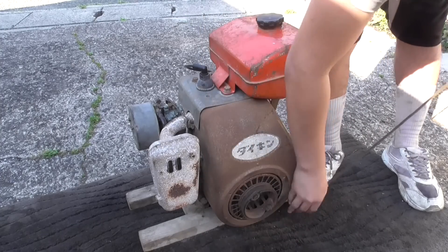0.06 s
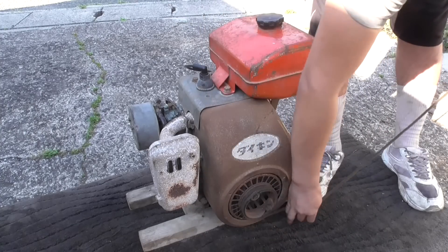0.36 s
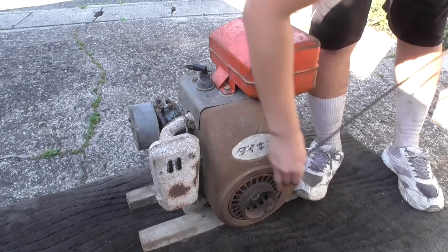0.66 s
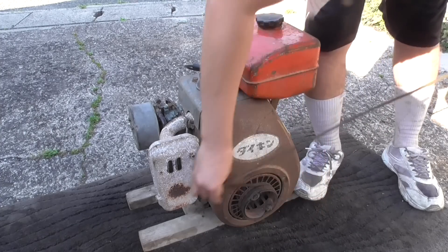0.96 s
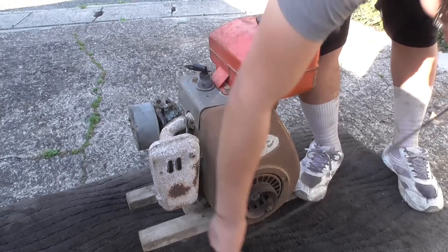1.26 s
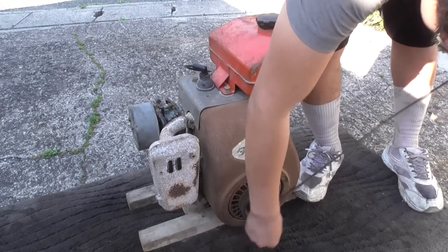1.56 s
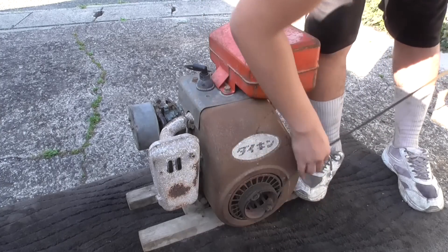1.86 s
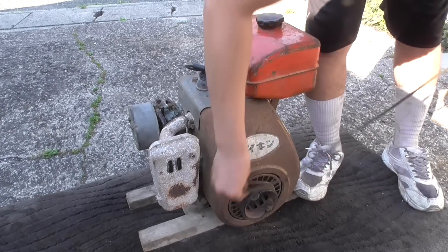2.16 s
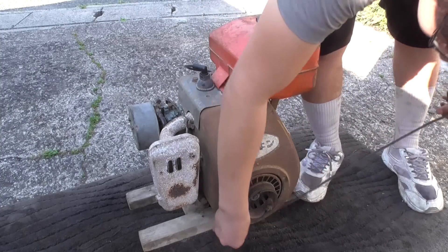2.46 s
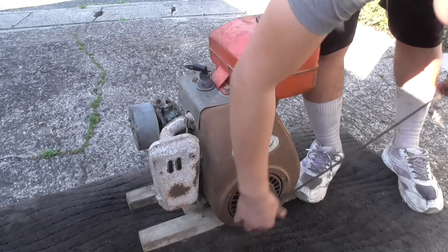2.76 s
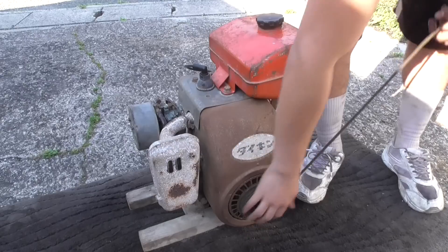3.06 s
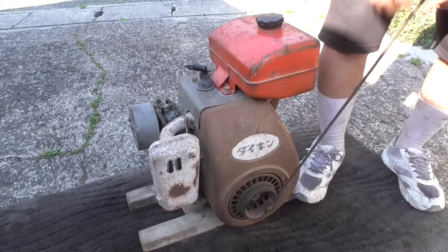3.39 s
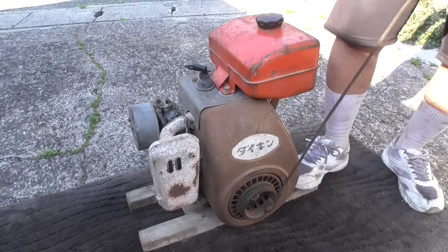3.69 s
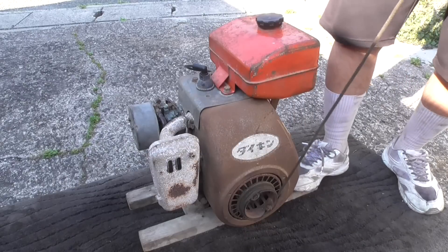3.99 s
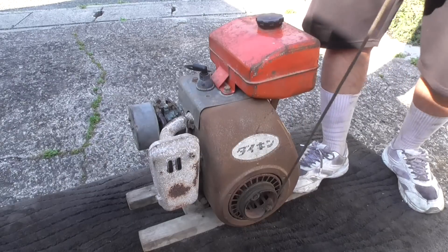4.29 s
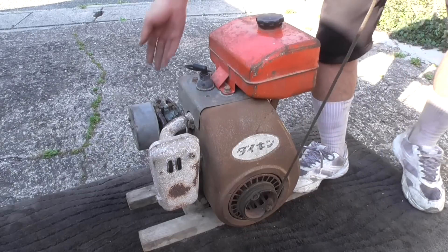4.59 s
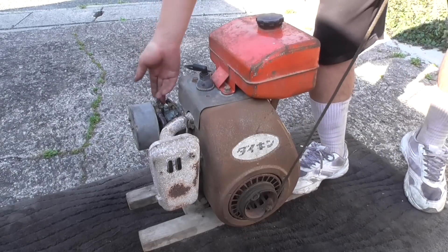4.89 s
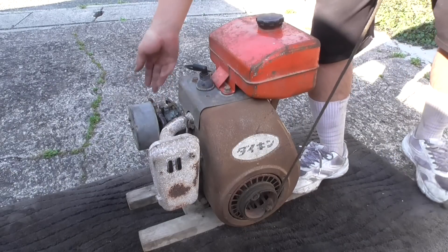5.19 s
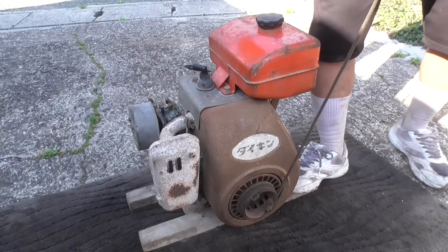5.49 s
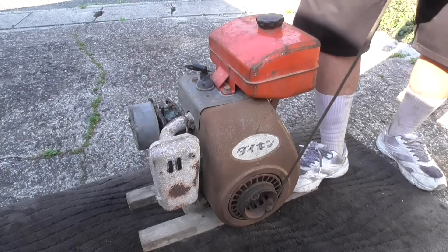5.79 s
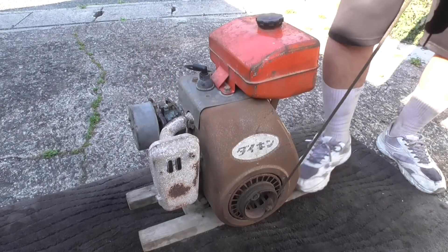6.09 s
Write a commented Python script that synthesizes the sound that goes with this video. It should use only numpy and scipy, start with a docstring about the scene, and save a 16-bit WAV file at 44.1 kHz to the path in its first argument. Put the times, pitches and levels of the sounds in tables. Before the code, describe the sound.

A rope rasps faintly round a small engine's pulley with light metal knocks and clinks, then one sharp ringing click, over distant traffic.

```python
"""A rope rasps in short pulls over a murmur of distant traffic: a starter cord is being wound by hand
round the pulley of a small, cold engine outdoors. Its fibres catch and slip, it zips into the groove and
clinks on the rim, the pulley knocks in its play, and an arm brushes the muffler's tin cover.
A breeze rumbles on the microphone, and the sound drops out for an instant.
Near the end a small lever snaps over and the engine's metal rings on."""
import sys
import numpy as np
from scipy import signal
from scipy.fft import rfft, irfft, next_fast_len
from scipy.io import wavfile

SR = 44100
rng = np.random.default_rng(int(sys.argv[2]) if len(sys.argv) > 2 else 0)


def generate_wav(signal):
    """Clip the signal to [-1, 1] and save it as 16-bit WAV at the path in sys.argv[1]."""
    frames = np.transpose(np.atleast_2d(signal))
    scaled = np.clip(frames, -1, 1) * 32767
    pcm = np.round(scaled).astype(np.int16)
    wavfile.write(sys.argv[1], SR, pcm)


N = 275625
TIME = np.arange(N) / SR

# All table levels are relative: the functions set the final balance.
# swell of the distant traffic: t/s, rumble level/dB, tyre wash level/dB
TRAFFIC = [(0, -53.5, -56), (2.2, -53, -56.5), (3.25, -47, -54.5), (4.445, -46.5, -53.5),
           (4.465, -42.5, -47.5), (4.9, -40.5, -49.5), (5.1, -47.5, -50), (6.25, -47.5, -53)]
# noise spectra of the background: f/Hz, level/dB
RUMBLE_COLOUR = [(25, -31), (45, -20.5), (75, -5), (98, -8), (125, -2), (148, -1), (200, -4), (270, 0),
                 (320, -2.5), (365, -12.5), (500, -19), (900, -41)]
WASH_COLOUR = [(200, -26), (420, -1.5), (700, -3.5), (1000, -5.5), (1350, -12), (1750, -21.5), (2500, -28),
               (4500, -32.5), (7000, -35.5)]
DRONE_COLOUR = [(70, -14), (110, -16), (149, 0), (168, -7.5), (200, -12)]
HISS_COLOUR = [(1000, 13), (3000, -14.5), (4400, -4.5), (6000, -14.5), (8000, -1.5), (11500, -3.5),
               (13500, -5.5), (16000, -13)]
WIND_COLOUR = [(22, -22.5), (40, -7), (65, -7), (100, 0.5), (140, 2.5), (200, -13), (300, -16.5),
               (600, -30.5)]
# path of the thin chirp: t/s, f/Hz, level/dB
CHIRP = [(4.652, 11950, -85), (4.660, 11900, -59), (4.668, 11500, -67), (4.674, 11300, -60),
         (4.684, 11200, -85)]
# gusts on the microphone: t/s, level/dB
GUSTS = [(0, -84), (2.15, -72), (2.27, -50), (2.52, -41), (2.8, -57.5), (3.15, -46), (3.3, -59),
         (3.88, -62), (4.02, -45), (4.2, -65), (5.2, -81)]
# small dry scuffs and taps: t/s, rise/s, fall/s, level/dB, f/Hz
TAPS = [(0.643, 0.0055, 0.016, -50, 1420), (1.224, 0.0013, 0.017, -48.5, 980),
        (4.196, .001, 0.0026, -57, 1170), (6.055, .001, 0.0017, -44.5, 1200)]

# arm bumping along the muffler cover, pulley rocking in its play: t/s, level/dB, hardness/Hz
ARM_BRUSHES = [(1.123, -57, 2460), (1.140, -52, 2250), (1.167, -53.5, 9000)]
PULLEY_KNOCKS = [(1.562, -51.5, 1380), (1.6845, -39.5, 2100), (1.6975, -39, 2050), (1.7735, -35.5, 1390),
                 (1.857, -40.5, 1110), (1.913, -39, 1090), (1.985, -47, 1070), (2.742, -36, 840),
                 (2.999, -38.5, 1540)]
# modes of the tin cover, pulley with fan housing, steel rim, lever and engine: f/Hz, level/dB, t60/s
COVER_MODES = [(1000, 6, .15), (1540, 1, .35), (1985, 1, .35), (2080, 3, .12), (2552, -8, .27),
               (2638, 1, .3), (3300, 2, .23), (5990, -3, .27), (7800, -13, .2)]
PULLEY_MODES = [(624, -42, 0.027), (719, -1.5, 0.31), (845, -9, 0.04), (1048, 7.5, 0.028), (1092, 2, 0.09),
                (1190, -7.5, 0.12), (1540, -9.5, 0.063), (1730, -10, 0.027), (2110, -9, 0.051),
                (2420, -9, 0.083)]
RIM_MODES = [(1980, 0, 0.11), (2350, 0.5, 0.095), (2610, -10, 0.12), (2800, -8, 0.3), (3370, -5.5, 0.19),
             (4520, -7, 0.17), (5560, -2, 0.074), (6270, 2, 0.036), (6650, -3, 0.092), (7840, -9, 0.26),
             (8600, 2, .04), (11700, 6, 0.049)]
LEVER_MODES = [(350, -47, 0.045), (535, -24, 0.011), (672, -16, 0.031), (827, -17, 0.025),
               (1050, -33, 0.019), (1948, -26, 0.02), (3195, -18, 0.028), (3860, -29, .03),
               (5060, -23.5, .022), (5700, -24, 0.018), (6920, -32, 0.034), (7110, -16, 0.029),
               (7600, -27, .035), (8150, -17, .035), (8700, -28, 0.037), (9260, -14, 0.024),
               (10700, -34.5, .04), (11180, -26, 0.035), (11820, -24, .04), (12480, -28, .03)]
ENGINE_MODES = [(338, -41, .3), (700, -40.5, .3), (1075, -47.5, .5), (1300, -52, .5), (1556, -54, .56),
                (1985, -56, .65), (3230, -52, .4), (3266, -56, .4), (3850, -58, .37), (5006, -60, .5),
                (5658, -47, .23), (5683, -54, .23), (6400, -60.5, .35), (6828, -56, .5), (7160, -53, .45),
                (7330, -52, .55), (8371, -49, .75), (9453, -42.5, .23), (10070, -54, .3),
                (10850, -48.5, .28), (11880, -52, .24)]
# lever hitting its stop and bouncing: t/s, level/dB
LEVER_HITS = [(5.1948, -4.5), (5.1936, -3), (5.196, -10.5)]
# spectra of the snap's crack and of the shimmer of many faint modes: f/Hz, level/dB
CRACK_COLOUR = [(200, -14), (400, -4), (580, 2), (850, 1), (1500, -5), (2500, -13), (4300, -10), (5300, -7),
                (6300, -6), (9000, 0), (11500, -1), (13500, -9), (16000, -10)]
SHIMMER_COLOUR = [(400, 4.5), (1500, -3), (2600, -11), (3250, -4.5), (4200, -5.5), (6200, -13), (7200, 3),
                  (8500, 0), (9800, -22), (12000, -16), (14000, -29.5)]

# spectra of the rasping fibres and of the metal's answer to their pressure: f/Hz, level/dB
FIBRE_COLOUR = [(600, -14), (2400, -7), (4400, -7), (6200, -3.5), (8200, 0), (9700, -3), (12000, -1.5),
                (13200, -3.5), (14500, -10.5), (16000, -16)]
PRESSURE_COLOUR = [(300, 4), (700, 17.5), (1200, 12), (1900, 3.5), (2350, 6.5), (2800, -12), (3500, 0.5),
                   (4500, -34), (5800, -10), (9000, -25)]
# pulls of the rope over the pulley: t/s, length/s, level/dB, pressure on the metal/dB
PULLS = [(0.163, 0.029, -58.5, 4), (0.231, 0.031, -59, 5), (0.368, 0.056, -55, -1.5),
         (0.506, 0.14, -53.5, 3), (0.779, 0.058, -55.5, 4), (1.040, 0.039, -55, 5),
         (1.116, 0.061, -54.5, 4.5), (1.204, 0.05, -64, 2), (1.551, 0.029, -57.5, 7.5),
         (1.599, 0.097, -57, 4.5), (1.938, 0.059, -60.5, 5.5), (2.276, 0.068, -57, 5),
         (2.439, .052, -56.5, 8), (2.582, 0.043, -59.5, 5.5), (2.704, 0.041, -53, 8.5),
         (3.004, 0.032, -57, 10)]
# rope gliding lightly between pulls: t/s, level/dB
GLIDE = [(0, -70), (.12, -92), (.66, -78), (.87, -69.5), (1.04, -65.5), (1.3, -84), (2.1, -81),
         (2.4, -71.5), (2.83, -76), (3.17, -70), (3.35, -86)]
# rope snapping home against the rim: t/s, zip level/dB, clink level/dB, favoured f/Hz
SEATINGS = [(1.678, -55.5, -65, 2350), (2.3018, -40.5, -55.5, 2400), (2.724, -50, -55, 5620),
            (3.000, -70, -61.5, 3370)]


def from_db(db):
    """Decibels to gain."""
    return 10 ** (np.asarray(db) / 20)


def rms_one(x):
    """Scale to unit rms."""
    return x / np.sqrt(np.mean(x ** 2) + 1e-20)


def colour(x, spectrum):
    """EQ a steady signal with a curve that rolls off beyond its ends; rms 1."""
    hz, db = np.transpose(spectrum)
    size = next_fast_len(N)
    bins = np.maximum(np.fft.rfftfreq(size, 1 / SR), 1)
    gain = from_db(np.interp(np.log(bins), np.log(hz), db))
    roll_off = np.minimum(bins / hz[0], 1) ** 2 * np.minimum(hz[-1] / bins, 1) ** 2
    return rms_one(irfft(rfft(x, size) * gain * roll_off, size)[..., :N])


def stereo_noise(spectrum, side_db):
    """Coloured noise whose side level sets its width; rms 1."""
    mid, side = rng.standard_normal((2, N))
    return colour(mid + from_db(side_db) * side * [[1], [-1]], spectrum)


def wobble(per_s):
    """Random ups and downs of about unit size."""
    steps = np.arange(4000)
    return np.interp(TIME * per_s, steps, rng.standard_normal(len(steps)))


def swells(rows):
    """Envelope of bell-shaped swells, each given as peak t/s, rise/s, fall/s, level/dB."""
    power = np.zeros(N)
    for t, rise, fall, db in rows:
        near = slice(max(int((t - 5 * rise) * SR), 0), int((t + 5 * fall) * SR))
        lag = TIME[near] - t
        width = np.where(lag < 0, rise, fall)
        power[near] += from_db(db) ** 2 * np.exp(-(lag / width) ** 2)
    return np.sqrt(power)


def decay(t, t60):
    """Envelope with an instant attack and an exponential tail."""
    return (TIME >= t) * from_db(-60 * np.clip((TIME - t) / t60, 0, 4))


def click(t, db):
    """A hard, instant contact."""
    return from_db(db) * signal.unit_impulse(N, round(t * SR))


def push(t, db, hardness_hz):
    """A soft contact spreads the force in time and leaves the high modes quiet."""
    lowpass = signal.butter(4, hardness_hz, fs=SR, output="sos")
    return signal.sosfilt(lowpass, click(t, db) + 1e-18)


def slips(per_s):
    """Friction catches and lets go: dense tiny clicks of uneven size; rms 1."""
    return rms_one((rng.random(N) < per_s / SR) * rng.standard_normal(N))


def ring(force, modes):
    """A force sets each mode ringing as a dying sine, signs alternating."""
    out = np.zeros(N)
    for k, (hz, db, t60) in enumerate(modes):
        radius, angle = from_db(-60 / (t60 * SR)), 2 * np.pi * hz / SR
        feedback = [1, -2 * radius * np.cos(angle), radius ** 2]
        out += (-1) ** k * from_db(db) * signal.lfilter([0, np.sin(angle)], feedback, force + 1e-18)
    return out


def noise_tails(t60, count):
    """Very many short-lived modes or reflections blur into dying noise; unit energy in each row."""
    lag = np.arange(SR // 8) / SR
    tails = rng.standard_normal((count, len(lag))) * from_db(-60 * lag / t60)
    return tails / np.sqrt(np.sum(tails ** 2, axis=1, keepdims=True))


def scatter(x, level_db, t60, low_cut_hz):
    """Fins, tank and ground add a brief, bright spray of reflections, different at each ear."""
    highpass = signal.butter(2, low_cut_hz, "high", fs=SR, output="sos")
    echoes = signal.sosfilt(highpass, noise_tails(t60, count=2))
    return x + from_db(level_db) * signal.fftconvolve(x * np.ones((2, 1)), echoes, axes=1)[:, :N]


def place(x, pan_db, lead_s):
    """Panning: the left ear is louder by pan_db and earlier by lead_s."""
    sides = np.array([[.5], [-.5]])
    time_shift = np.exp(2j * np.pi * np.fft.rfftfreq(N, 1 / SR) * lead_s * sides)
    return from_db(pan_db * sides) * irfft(rfft(x) * time_shift, N)


def hiss():
    """A steady, wide bed of microphone hiss."""
    return from_db(-63.5) * stereo_noise(HISS_COLOUR, side_db=0.8)


def drone():
    """A far, steady drone: low noise with one narrow peak."""
    return from_db(-53) * stereo_noise(DRONE_COLOUR, side_db=-25)


def traffic():
    """Distant traffic: a low rumble and a wider wash of tyres, swelling in the second half."""
    t, rumble_db, wash_db = np.transpose(TRAFFIC)
    rumble = from_db(np.interp(TIME, t, rumble_db)) * stereo_noise(RUMBLE_COLOUR, side_db=-14)
    wash = from_db(np.interp(TIME, t, wash_db)) * stereo_noise(WASH_COLOUR, side_db=-6)
    return rumble + wash


def chirp():
    """One thin, very high chirp: a falling sine that pulses twice."""
    t, hz, db = np.transpose(CHIRP)
    phase = 2 * np.pi * np.cumsum(np.interp(TIME, t, hz)) / SR
    return np.interp(TIME, t, from_db(db), left=0, right=0) * np.sin(phase)


def wind():
    """Eddies between the two microphone ports push them mostly in opposite directions."""
    t, db = np.transpose(GUSTS)
    gusts = from_db(np.interp(TIME, t, db) + 0.7 * wobble(per_s=8))
    buffet = swells([(3, 0.2262, 0.2262, -30)]) * (TIME < 2.65)   # cut short while still rising
    return from_db(3.5) * (gusts + buffet) * stereo_noise(WIND_COLOUR, side_db=7.5)


def taps():
    """Brief bursts of friction, each in a half-octave band round its own pitch."""
    grains, out = slips(per_s=4800), 0
    for *swell, hz in TAPS:
        band = signal.butter(2, hz * 2 ** np.array([-.25, .25]), "band", fs=SR, output="sos")
        out += swells([swell]) * rms_one(signal.sosfilt(band, grains))
    return out


def muffler():
    """An arm bumps along the cover, and the thin tin keeps singing after the touch."""
    force = sum(push(*brush) for brush in ARM_BRUSHES)
    return from_db(-1.5) * ring(force, COVER_MODES)


def pulley(spread_db=2.7):
    """The pulley knocks in its play; each knock shares itself out differently among the modes."""
    out = 0
    for knock in PULLEY_KNOCKS:
        modes = [(hz, db + spread_db * rng.standard_normal(), t60) for hz, db, t60 in PULLEY_MODES]
        out += ring(push(*knock), modes)
    return from_db(-1.5) * out


def rim(rebound_s=0.0081, rebound_db=1.5, favour_db=8, favour_octaves=0.12):
    """The steel rim clinks twice as the rope drops into the groove; each spot favours its own note."""
    hz, db, t60 = np.transpose(RIM_MODES)
    out = 0
    for t, _, clink_db, note_hz in SEATINGS:
        boost_db = favour_db * np.exp(-(np.log2(hz / note_hz) / favour_octaves) ** 2)
        double_hit = click(t, clink_db) + click(t + rebound_s, clink_db + rebound_db)
        out += ring(double_hit, zip(hz, db + boost_db, t60))
    return from_db(-3.5) * out


def lever():
    """The lever cracks against its stop, bounces and clacks; the engine's metal rings on around it."""
    start = LEVER_HITS[0][0]
    contacts = sum(from_db(db) * decay(t, t60=0.0093) for t, db in LEVER_HITS)
    crack_level = from_db(-14.5) * contacts + from_db(-25.5) * decay(start, t60=0.087)
    crack = crack_level * stereo_noise(CRACK_COLOUR, side_db=-8)
    shimmer = from_db(-43.5) * decay(start, t60=0.5) * stereo_noise(SHIMMER_COLOUR, side_db=-4.5)
    clack = ring(click(start, db=-1), LEVER_MODES)
    ring_out = ring(click(start, db=0.3), ENGINE_MODES)
    return crack + shimmer + clack + ring_out


def pull(start, length, grip_s=0.0052, arch_db=5.5, release_s=0.013):
    """Envelope of one pull: a quick grip, an arch while the hand moves, a short release."""
    lag = np.clip(TIME - start, 0, 1)
    grip = 1 - np.exp(-lag / grip_s)
    arch = from_db(-arch_db * (2 * np.minimum(lag / length, 1) - 1) ** 2)
    release = np.exp(-np.maximum(lag - length, 0) / release_s)
    return grip * arch * release


def rope(spots=5, zip_rise_s=0.0024, zip_fall_s=0.0094, zip_pressure_db=-13):
    """The fibres rasp over the pulley; the harder they press, the more the metal sounds along."""
    grains = slips(per_s=4100)
    fibres = colour(grains, FIBRE_COLOUR)
    metal = colour(slips(per_s=8200), PRESSURE_COLOUR)
    catching = from_db(wobble(per_s=110))   # twisted strands roughen the rasp by about 1 dB
    moves = [(from_db(db) * pull(t, length), pressure_db) for t, length, db, pressure_db in PULLS]
    for t, zip_db, _, _ in SEATINGS:   # the last quick slip into the groove
        moves.append((swells([(t + zip_rise_s, zip_rise_s, zip_fall_s, zip_db)]), zip_pressure_db))
    rasps, load = 0, 0
    # successive moves touch other spots on the pulley and wake other dense modes
    for k, dense_modes in enumerate(noise_tails(t60=0.028, count=spots)):
        speed = sum(level for level, _ in moves[k::spots])
        pressure = sum(level * from_db(pressure_db) for level, pressure_db in moves[k::spots])
        rasp = catching * (speed * fibres + from_db(-0.5) * pressure * metal)
        rasps += rasp + signal.oaconvolve(rasp, dense_modes)[:N]
        load += pressure
    glide = from_db(np.interp(TIME, *np.transpose(GLIDE))) * fibres   # too light to wake the metal
    body = ring(load * grains, PULLEY_MODES)
    return from_db(-4) * rasps + glide + from_db(-40) * body


def scene():
    """The engine stands close in front, a little to the left, against the outdoor bed."""
    winding = scatter(rope() + rim() + pulley() + muffler(), level_db=-3, t60=0.026, low_cut_hz=5900)
    snap = scatter(lever(), level_db=-8.5, t60=0.018, low_cut_hz=7000)
    engine = place(winding, pan_db=1.6, lead_s=8e-6) + place(snap, pan_db=1.4, lead_s=-13e-6)
    return engine + taps() + wind() + traffic() + drone() + hiss() + chirp()


def record(dry):
    """The sound drops out for 20 ms, and a steep low-pass takes off the very top."""
    gap_start_s, gap_end_s, cutoff_hz = 4.4445, 4.4645, 15800
    gate = (TIME < gap_start_s) | (TIME > gap_end_s)
    lowpass = signal.ellip(10, .1, 80, cutoff_hz, fs=SR, output="sos")
    return signal.sosfilt(lowpass, dry * gate)


dry = scene()
out = record(dry)
generate_wav(out)
```